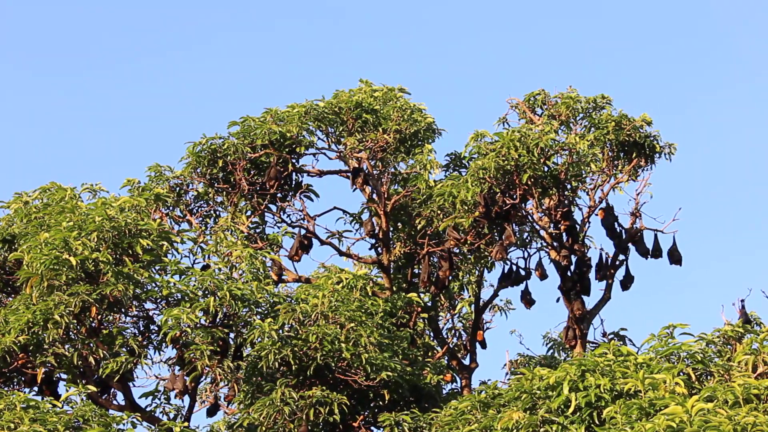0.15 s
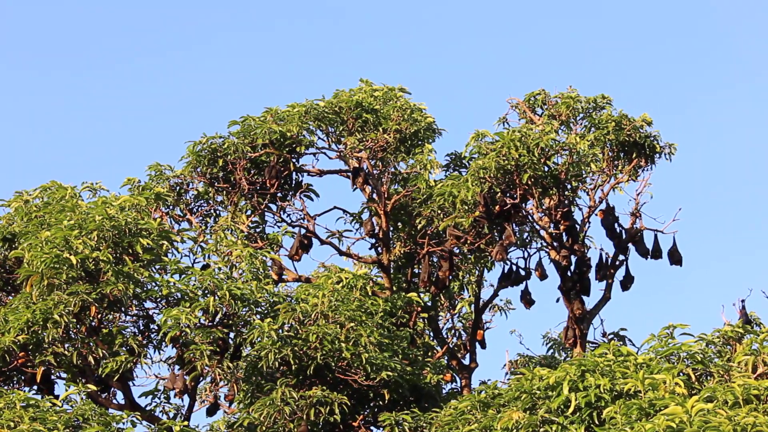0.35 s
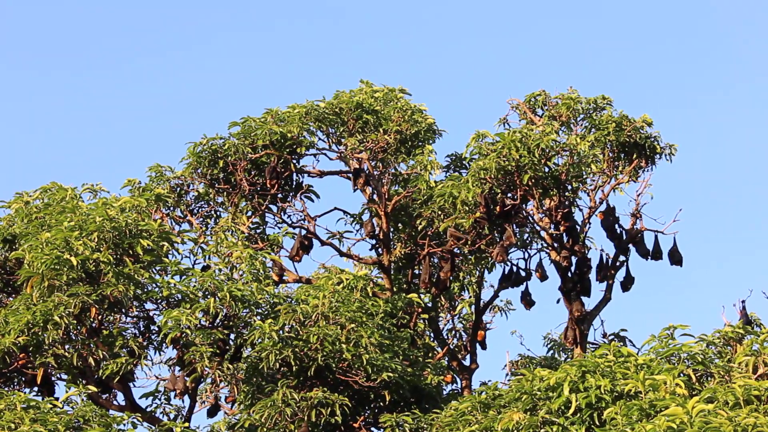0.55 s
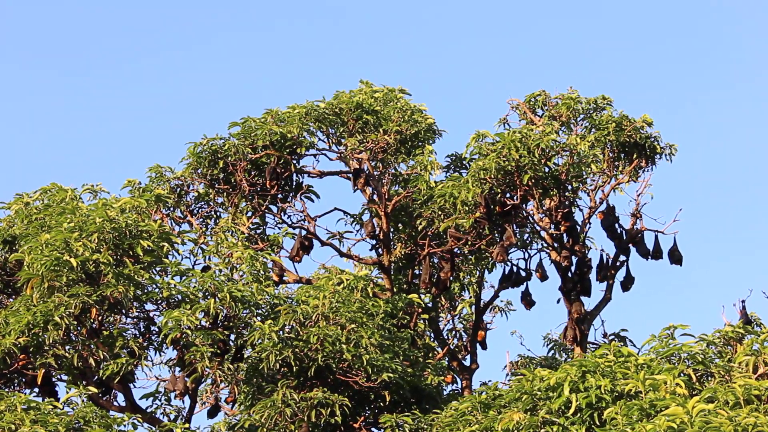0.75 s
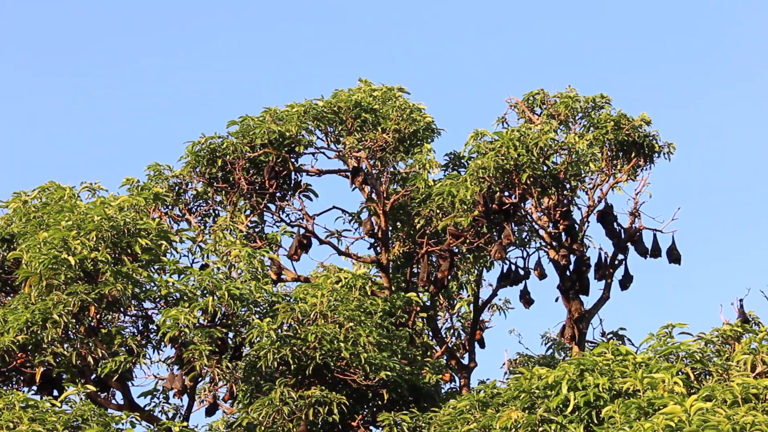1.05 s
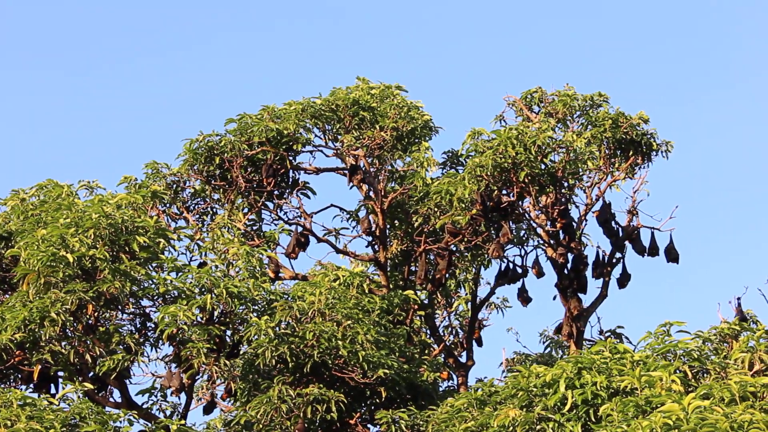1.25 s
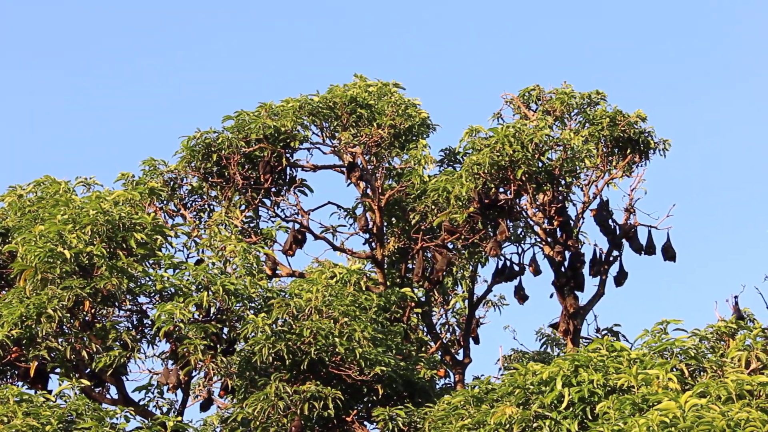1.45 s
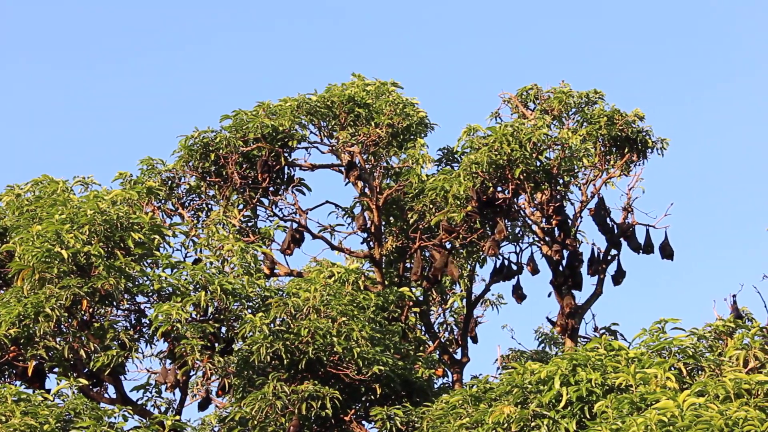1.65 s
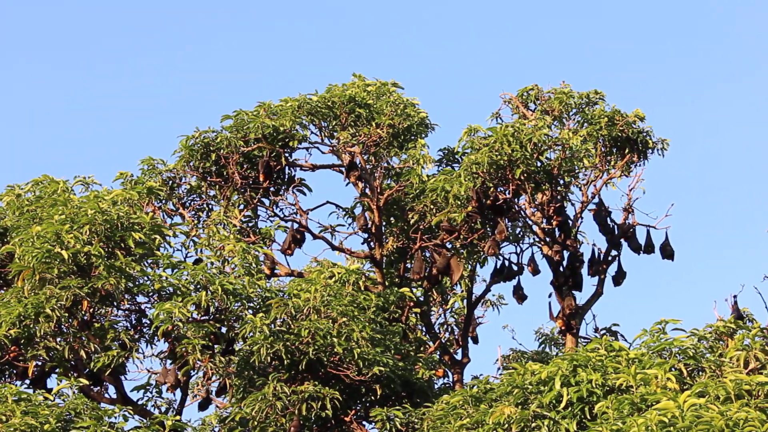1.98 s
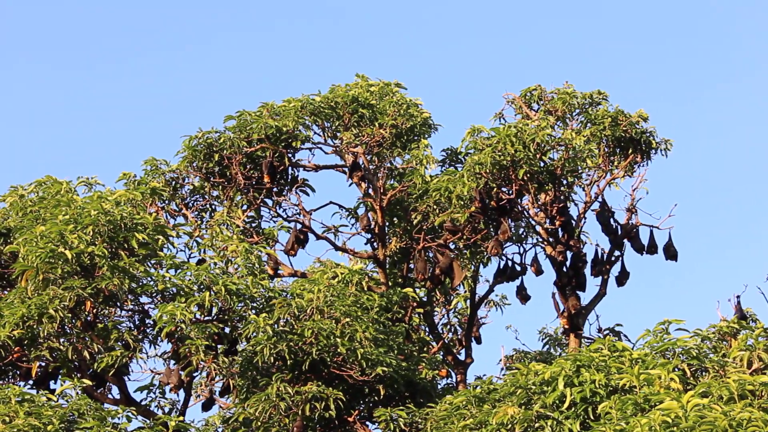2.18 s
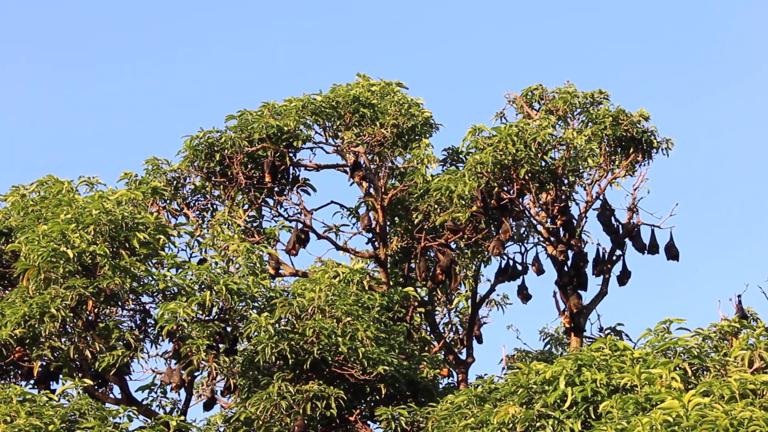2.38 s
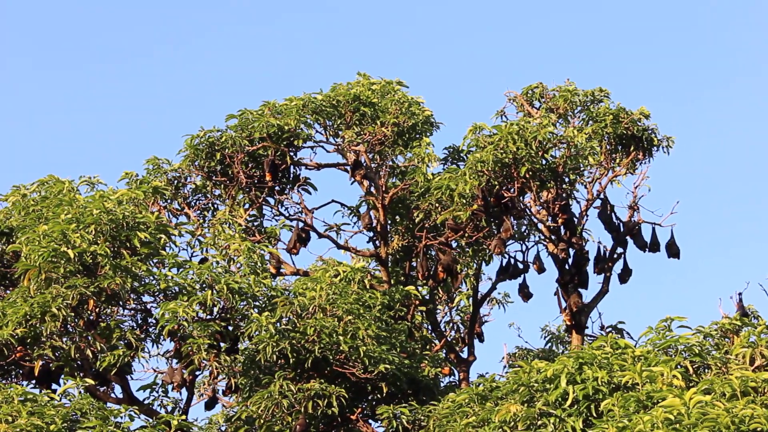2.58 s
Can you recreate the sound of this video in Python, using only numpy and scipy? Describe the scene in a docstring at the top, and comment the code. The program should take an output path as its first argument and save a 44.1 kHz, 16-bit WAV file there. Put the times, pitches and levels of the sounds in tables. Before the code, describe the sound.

Fruit bats bicker at an outdoor treetop roost, heard in mono from some way off. Piercing squeals, quick yelps and buzzy screeches tumble over each other, lightly scattered by the trees, with far cries and a soft rumble behind.

```python
"""Tall trees with a colony of fruit bats squabbling in them, heard in mono from some way off.
The nearest animals squeal in shaky tones that break into rasps, among short notes and pieces of squeals.
Lower screeches are buzz and breath noise shaped by throat resonances that move with the pitch.
Behind them far cries and a band of swaying noise make the roost's chorus; the trees scatter the calls.
Low-pass noise gives a faint rumble of wind or far traffic."""
import sys
import numpy as np
from scipy import signal
from scipy.fft import rfft, irfft
from scipy.io import wavfile

SR = 44100
rng = np.random.default_rng(int(sys.argv[2]) if len(sys.argv) > 2 else 0)


def store_wav(level_fs):
    """Save 16-bit WAV to argv[1]."""
    pcm = np.round(np.clip(np.atleast_2d(level_fs), -1, 1) * 32767)
    wavfile.write(sys.argv[1], SR, pcm.T.astype(np.int16))


N = 119952
T = np.arange(N) / SR  # s

# Harmonics of a bat's shrill voice: multiple of the pitch, level/dB
VOICE_HARMONICS = [(1, 2), (2, -34), (3, -41), (4, -38), (5, -49), (6, -45)]
CALL_ATTACK_S, CALL_RELEASE_S = .013, .021  # of screeches and the whine
CUTOFF_HZ = 15750  # top of the microphone signal


def from_db(db):
    """Decibels to amplitude gain."""
    return 10 ** (np.asarray(db) / 20)


def rms_one(x):
    """Scale to unit rms."""
    return x / np.sqrt(np.mean(x ** 2) + 1e-20)


def drift(rate_hz, size):
    """Smooth random motion of spread about 1: white noise through two equal low-pass poles."""
    pole = np.exp(-2 * np.pi * rate_hz / SR)
    noise = rng.standard_normal(size + SR // 4)  # the extra quarter second lets the filter settle
    slow = signal.lfilter([1], [1, -2 * pole, pole * pole], noise)
    return rms_one(slow)[-size:]


def fade(t, length, attack, release):
    """Straight attack, hold and straight release, all in seconds."""
    return np.clip(t / attack, 0, 1) * np.clip((length - t) / release, 0, 1)


def during(start, length):
    """Sample numbers of a call."""
    return np.flatnonzero((T >= start) & (T < start + length))


def coloured_noise(spectrum):
    """Noise of rms 1 whose spectrum runs straight in dB over log frequency between the points."""
    point_hz, point_db = np.transpose(spectrum)
    f = np.maximum(np.fft.rfftfreq(N, 1 / SR), 1)
    gain = from_db(np.interp(np.log(f), np.log(point_hz), point_db))
    white = rfft(rng.standard_normal(N))
    return rms_one(irfft(white * gain, N))


def low_pass(x, order, cutoff_hz):
    """Butterworth low-pass."""
    return signal.sosfilt(signal.butter(order, cutoff_hz, fs=SR, output="sos"), x)


def resonance(x, centre_hz, width_hz):
    """A band-pass with a moving centre, rms 1: shift the band to zero, low-pass, shift back."""
    carrier = np.exp(2j * np.pi * np.cumsum(centre_hz) / SR)
    band = low_pass(x / carrier, 2, width_hz / 2)
    return rms_one(np.real(carrier * band))


def voice(hz, rasp, partials):
    """A shrill tone whose pitch and strength shake at random, more so as it rasps."""
    size = len(hz)
    clear_jitter, rasp_jitter = .006, .046  # share of the pitch, at rasp 0 and 1
    clear_flutter, rasp_flutter = .25, .8  # depth of strength, at rasp 0 and 1
    stutter_db, stutter_hz = 1.8, 55
    warble, warble_hz = .008, 37.2

    jitter = (clear_jitter + rasp * (rasp_jitter - clear_jitter)) * drift(350, size)
    flutter_depth = clear_flutter + rasp * (rasp_flutter - clear_flutter)
    flutter = 1 + flutter_depth * np.tanh(1.4 * drift(130, size))
    stutter = from_db(stutter_db * (1 + rasp) * np.tanh(drift(stutter_hz, size)))
    shaken_hz = hz * (1 + jitter + warble * drift(warble_hz, size))
    phase = 2 * np.pi * np.cumsum(shaken_hz) / SR
    tone = sum(from_db(db) * np.sin(k * phase) for k, db in partials if k * hz.max() < SR / 2)
    return np.sqrt(2) * rms_one(flutter * stutter) * tone


def screeches():
    """A wavering buzz, smeared by distance, and air pulsing each cycle ring the throat resonances."""
    # Calls: t/s, length/s, first and last f/Hz ahead of the arch, level/dB in each resonance, low to high
    screech_calls = [(-.02, 0.12, 907, 831, -29, -30, -50, -57),
                     (0.131, 0.17, 629, 654, -51, -51, -43, -44),
                     (.27, 0.18, 593, 690, -36, -37, -37.5, -41),
                     (0.422, 0.12, 717, 589, -34, -38, -34, -40),
                     (.55, 0.097, 825, 804, -25, -51, -45, -49),
                     (.67, 0.099, 545.6, 590, -26.5, -33.5, -38, -51),
                     (0.734, 0.075, 846, 887, -45, -32, -39, -41),
                     (.80, 0.27, 790.7, 800, -47, -34.5, -32.5, -43.5),
                     (1.07, 0.15, 902, 860, -27, -53, -56, -54),
                     (1.42, 0.22, 708, 700, -24.5, -33.5, -40.5, -54),
                     (1.65, .36, 569, 838.6, -26.5, -31, -44, -62),
                     (2.05, 0.15, 784, 767, -28.5, -37, -48, -65),
                     (2.24, 0.26, 621, 635.7, -22, -59, -61, -55),
                     (2.48, 0.17, 525.5, 558.6, -23, -30.5, -54, -49.5),
                     (2.65, 0.1, 720, 711, -24.5, -41, -44, -48)]
    # Throat resonances: f/Hz, width/Hz, exponent with which the centre follows the pitch
    throat = [(3000, 1150, .2), (5200, 1600, 1), (7300, 1500, .7), (11900, 2000, .8)]
    arch = .0342  # share by which the pitch lifts in mid-call
    jitter, waver = .015, .016  # shares of the pitch
    air_share = .4  # of the source power
    grain_db = 1.6

    out = np.zeros(N)
    for start, length, first_hz, last_hz, *levels_db in screech_calls:
        i = during(start, length)
        size, t = len(i), T[i] - start
        glide_hz = np.linspace(first_hz, last_hz, size)
        glide_hz = glide_hz * (1 + arch * (np.sin(np.pi * t / length) - 2 / np.pi))
        hz = glide_hz * (1 + jitter * drift(300, size) + waver * drift(20, size))
        phase = 2 * np.pi * np.cumsum(hz) / SR
        # Random harmonic phases smear the pulses
        harmonics = range(1, int(CUTOFF_HZ / first_hz))
        buzz = rms_one(sum(np.cos(k * phase + 2 * np.pi * rng.random()) for k in harmonics))
        air = rms_one(rng.standard_normal(size) * (1 + .5 * np.cos(phase)))
        source = np.sqrt(1 - air_share) * buzz + np.sqrt(air_share) * air
        envelope = fade(t, length, CALL_ATTACK_S, CALL_RELEASE_S)
        for (centre_hz, width_hz, follows), db in zip(throat, levels_db):
            moving_hz = centre_hz * (hz / hz.mean()) ** follows
            gain = from_db(db + grain_db * drift(140, size))
            out[i] += gain * envelope * resonance(source, moving_hz, width_hz)
    return out


def cries():
    """Short notes and pieces of squeals, each gliding straight from its first pitch to its last."""
    # t/s, length/s, first f/Hz, last f/Hz, level/dB ahead of the harmonics' own,
    # rasp (0 or less clear, 1 harsh, 2 a croak)
    short_notes = [(0, 0.054, 3564, 3460, -30.5, -1), (.395, 0.079, 2460, 2530, -24, -0.2),
                   (0.482, 0.048, 3270, 3230, -27, -0.2), (0.555, 0.07, 3140, 3270, -23.5, 0.4),
                   (.588, .036, 2480, 2486, -20, .1), (0.825, 0.048, 3380, 3340, -27.5, .05),
                   (.922, 0.046, 3270, 3260, -25, 1.3), (1.005, 0.046, 3280, 3270, -25.5, 0.1),
                   (1.06, .11, 4410, 4245, -31, -1), (1.287, 0.061, 5260, 5080, -35.5, 0.5),
                   (1.434, 0.072, 4240, 4250, -32.5, -0.3), (1.823, 0.17, 790, 835, -36.5, 2),
                   (2.071, 0.13, 3117, 3068, -27, 0.4)]
    fade_s = .0072

    out = np.zeros(N)
    for start, length, first_hz, last_hz, db, rasp in short_notes:
        i = during(start, length)
        envelope = from_db(db) * fade(T[i] - start, length, fade_s, fade_s)
        hz = np.linspace(first_hz, last_hz, len(i))
        out[i] += envelope * voice(hz, max(rasp, 0), VOICE_HARMONICS)
    return out


def far_cries():
    """Short gliding cries from the distant roost, one at a random moment of each equal time slot."""
    cries_per_s, length_s, level_db = 22, .12, -30.5
    centre_hz, spread_oct, glide_oct = 2675, .34, .0795  # spread and glide go up or down by at most this

    out = np.zeros(N)
    count = int(cries_per_s * N / SR)
    for slot, (when, pitch, glide, rasp) in enumerate(rng.random((count, 4))):
        start = (slot + when) / count * T[-1] - length_s / 2
        i = during(start, length_s)
        progress = (T[i] - start) / length_s
        octaves = spread_oct * (2 * pitch - 1) + glide_oct * (2 * glide - 1) * progress
        swell = np.sin(np.pi * progress)
        out[i] += swell * voice(centre_hz * 2 ** octaves, rasp, VOICE_HARMONICS)
    return from_db(level_db) * out


def roost_wash():
    """The far roost's blurred cries: coloured noise whose level sways at random."""
    # f/Hz, relative level/dB per Hz
    roost_spectrum = [(1200, -25), (1900, -16), (2400, 0), (2900, -1.5), (3800, -7), (5000, -11),
                      (7000, -15.5), (9300, -29.5), (12500, -35.5), (15500, -38)]
    level_db, sway_db, sway_hz = -24, 1.02, 21
    return from_db(level_db + sway_db * drift(sway_hz, N)) * coloured_noise(roost_spectrum)


def rumble():
    """Wind or far traffic: steady coloured noise under a low-pass."""
    # f/Hz, relative level/dB per Hz ahead of the low-pass
    rumble_spectrum = [(20, -19), (101, 0.5), (442, -6.5), (836, -4), (1600, -5.5), (2210, 2.5),
                       (3740, -120)]
    level_db, top_hz = -30.5, 1880
    return from_db(level_db) * rms_one(low_pass(coloured_noise(rumble_spectrum), 4, top_hz))


def squeals():
    """The near bats: each squeal starts clear or a little hoarse and may break into a rasp."""
    # One curve for each squeal: t/s, f/Hz, level/dB ahead of the harmonics' own
    OPENING_YELP = [(.325, 3060, -26), (.35, 2970, -23), (.366, 3250, -19.5), (.385, 3240, -27),
                    (.422, 3230, -27)]
    FIRST_SQUEAL = [(.485, 2545, -29), (.505, 2390, -17.5), (.528, 2335, -14.5), (.554, 2447, -16),
                    (.566, 2390, -25)]
    HIGH_SQUEAL = [(.66, 5160, -41), (.688, 5830, -33), (.718, 5700, -31), (.727, 6350, -42),
                   (.736, 6920, -28.5), (.78, 7030, -31), (.865, 7080, -40)]
    LONG_SQUEAL = [(.795, 2533, -25), (.814, 2633, -11.5), (.848, 2599, -22), (.876, 2424, -24.5),
                   (.92, 2500, -19), (1.032, 2451, -22.5), (1.082, 2447, -14.5), (1.108, 2528, -23.5),
                   (1.165, 2554, -20), (1.185, 2707, -14.5), (1.228, 2840, -21)]
    FALLING_SQUEAL = [(1.395, 2326, -30), (1.415, 2664, -19), (1.449, 2928, -22), (1.571, 2795, -18),
                      (1.68, 2772, -31)]
    LOW_SQUEAL = [(1.452, 2230, -30), (1.485, 2174, -21.5), (1.53, 2260, -26), (1.762, 2410, -22),
                  (1.85, 2671, -27)]
    SHARP_YELP = [(2.026, 2825, -18), (2.038, 2820, -18), (2.046, 3120, -15.5), (2.06, 3060, -23),
                  (2.072, 2905, -19), (2.092, 2890, -22)]
    RISING_SQUEAL = [(2.025, 2074, -24), (2.139, 2286, -32), (2.223, 2233, -23), (2.29, 2618, -23.5),
                     (2.38, 2454, -24.5), (2.45, 2620, -20)]
    LAST_SQUEAL = [(2.655, 2444, -27), (2.69, 2523, -16), (2.72, 2574, -25.5)]
    # Curve, rasp at the start 0-1, t/s at which the voice breaks
    squeal_calls = [(OPENING_YELP, .1, .42), (FIRST_SQUEAL, 0, .56), (HIGH_SQUEAL, .1, .79),
                    (LONG_SQUEAL, .08, 1.178), (FALLING_SQUEAL, .05, 1.61), (LOW_SQUEAL, .1, 1.53),
                    (SHARP_YELP, .05, 2.09), (RISING_SQUEAL, .1, 2.27), (LAST_SQUEAL, 0, 2.72)]
    break_s, edge_s = .023, .006  # time the rasp takes to grow full; fade at either end

    out = np.zeros(N)
    for curve, hoarse, break_at in squeal_calls:
        s, hz, db = np.transpose(curve)
        start = s[0] - edge_s
        length = s[-1] - s[0] + 2 * edge_s
        i = during(start, length)
        rasp = np.clip((T[i] - break_at) / break_s, hoarse, 1)
        gain = from_db(np.interp(T[i], s, db)) * fade(T[i] - start, length, edge_s, edge_s)
        out[i] += gain * voice(np.interp(T[i], s, hz), rasp, VOICE_HARMONICS)
    return out


def whine():
    """One bat holds a low, even note, heard only through a few harmonics of its pitch."""
    # t/s, length/s, f/Hz
    whine_call = (2.08, .32, 582)
    # multiple of the pitch, level/dB
    whine_harmonics = [(3, -38), (4, -29), (6, -34)]

    start, length, hz = whine_call
    out = np.zeros(N)
    i = during(start, length)
    envelope = fade(T[i] - start, length, CALL_ATTACK_S, CALL_RELEASE_S)
    out[i] = envelope * voice(np.full(len(i), float(hz)), 0, whine_harmonics)
    return out


def crowns(x):
    """Leaves and trunks scatter a short diffuse tail: convolution with decaying noise."""
    level_db, t60_s, gap_s = -11, .4, .004
    t = T[:SR // 2]
    tail = rng.standard_normal(len(t)) * from_db(-60 * t / t60_s) * (t > gap_s)
    return from_db(level_db) * signal.fftconvolve(x, tail / np.linalg.norm(tail))[:N]


def scene():
    """Near and far calls with their echoes, the roost's wash and the rumble, alike in both channels."""
    calls = screeches() + cries() + far_cries() + squeals() + whine()
    mono = calls + crowns(calls) + roost_wash() + rumble()
    return np.tile(mono, (2, 1))


def record(dry):
    """The top is cut steeply by an elliptic low-pass."""
    return signal.sosfilt(signal.ellip(12, .1, 90, CUTOFF_HZ, fs=SR, output="sos"), dry)


dry = scene()
out = record(dry)
store_wav(out)
```